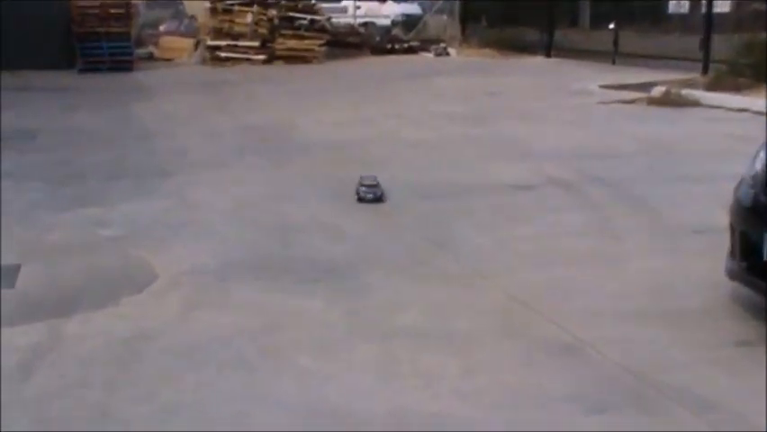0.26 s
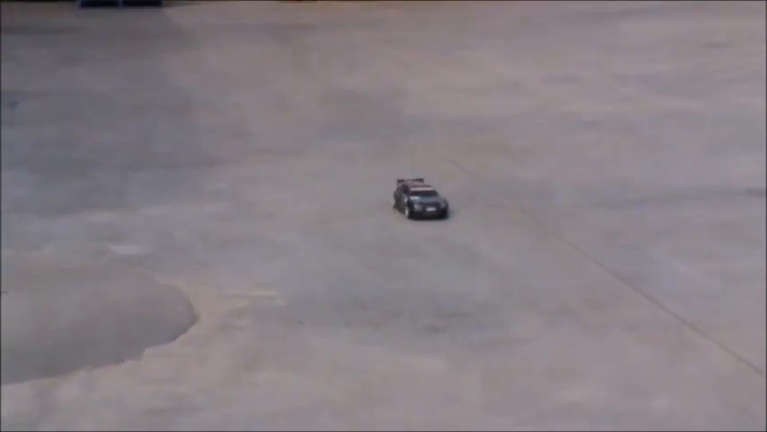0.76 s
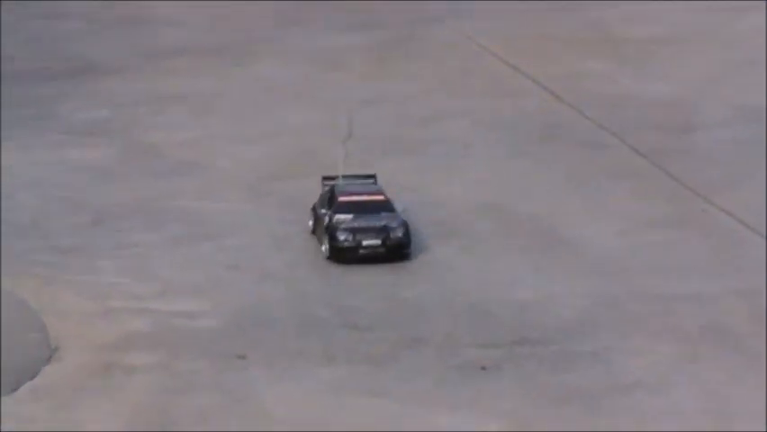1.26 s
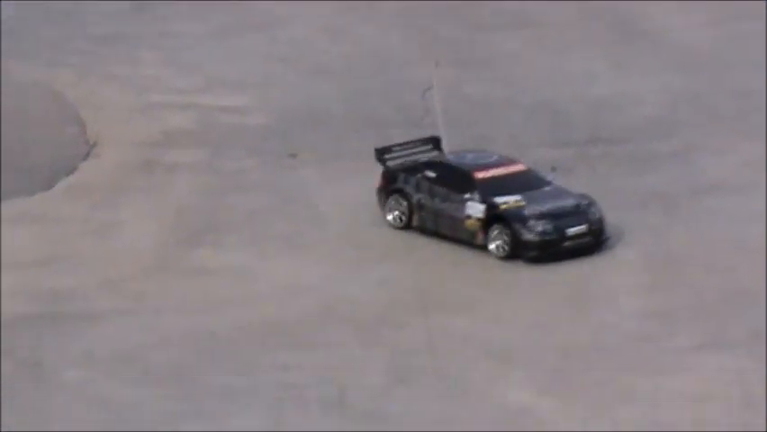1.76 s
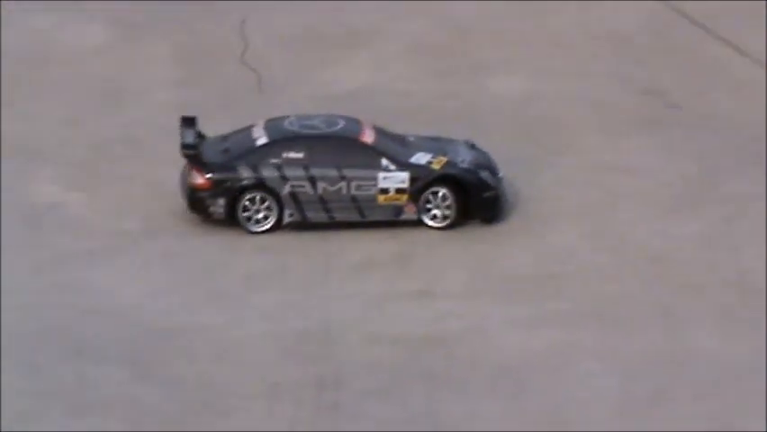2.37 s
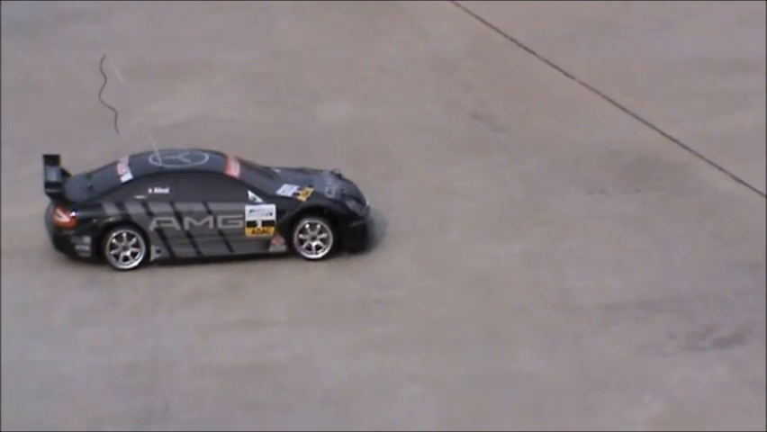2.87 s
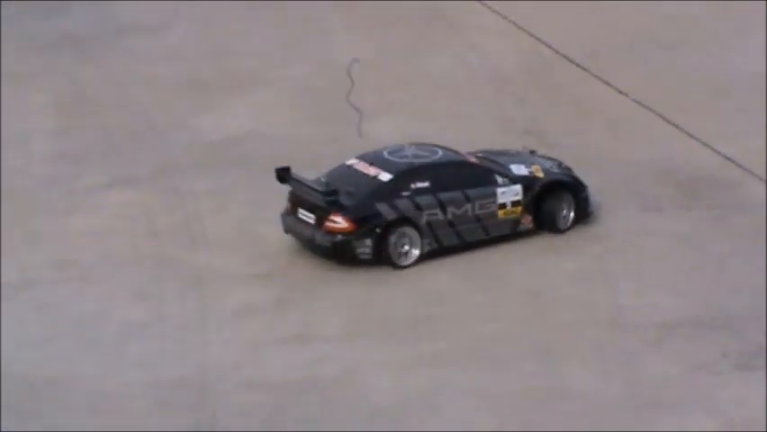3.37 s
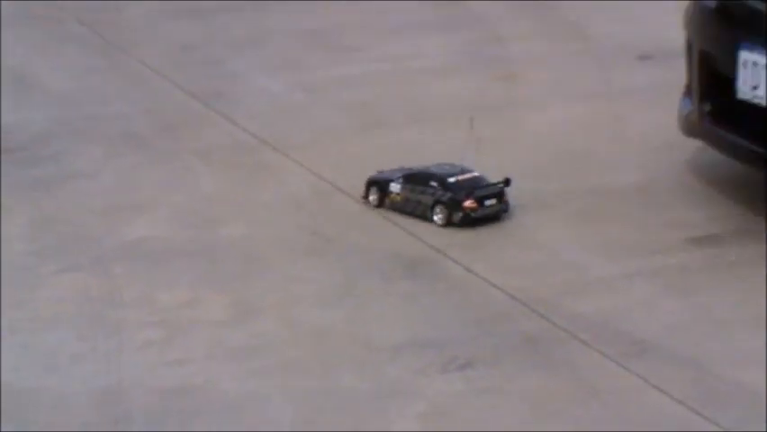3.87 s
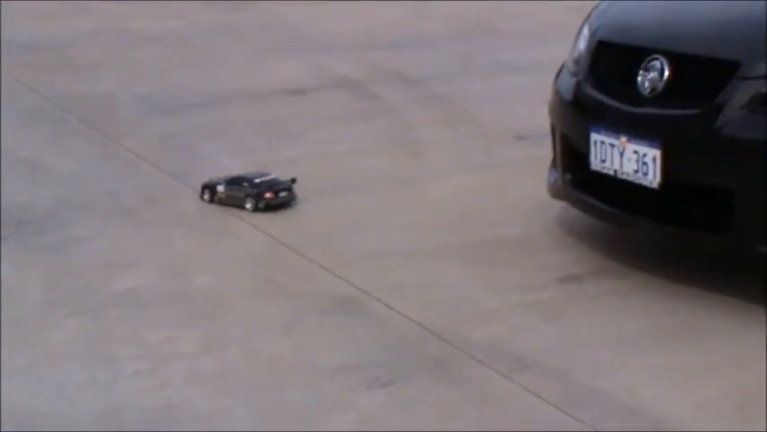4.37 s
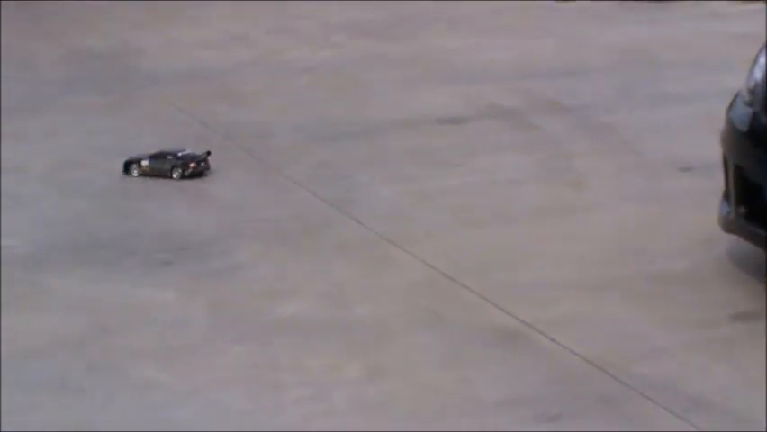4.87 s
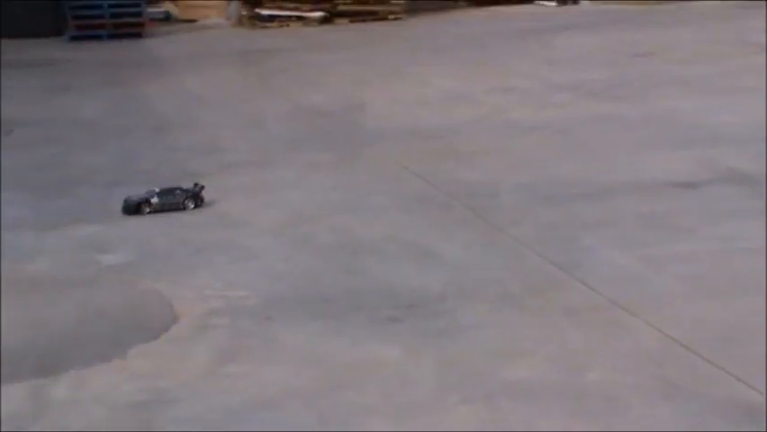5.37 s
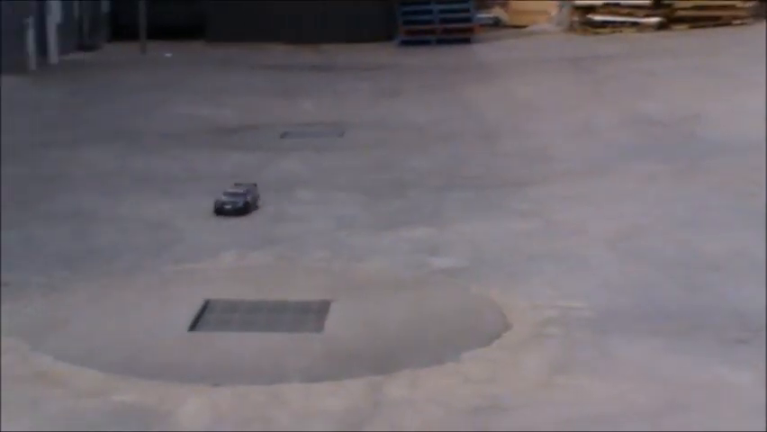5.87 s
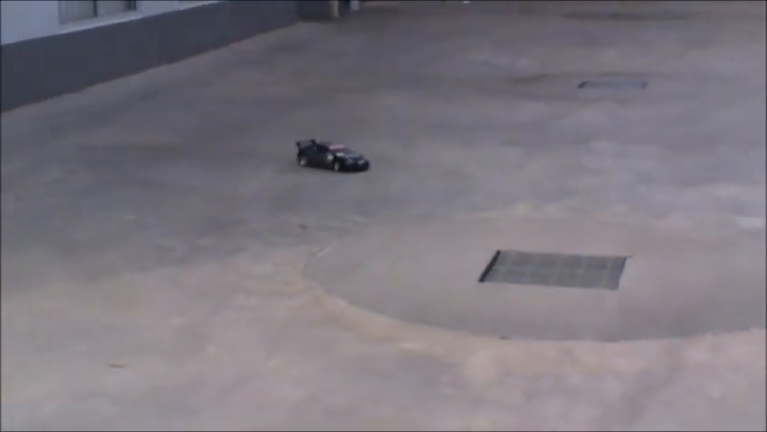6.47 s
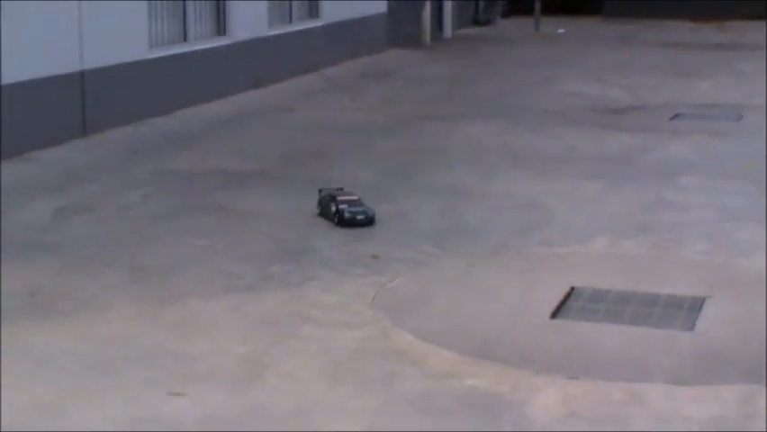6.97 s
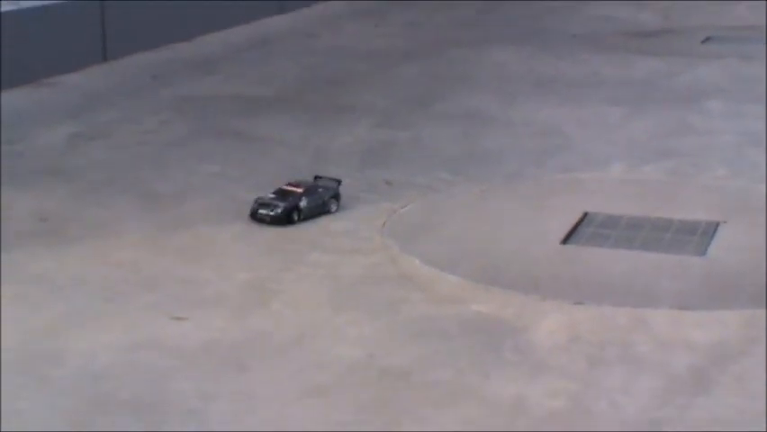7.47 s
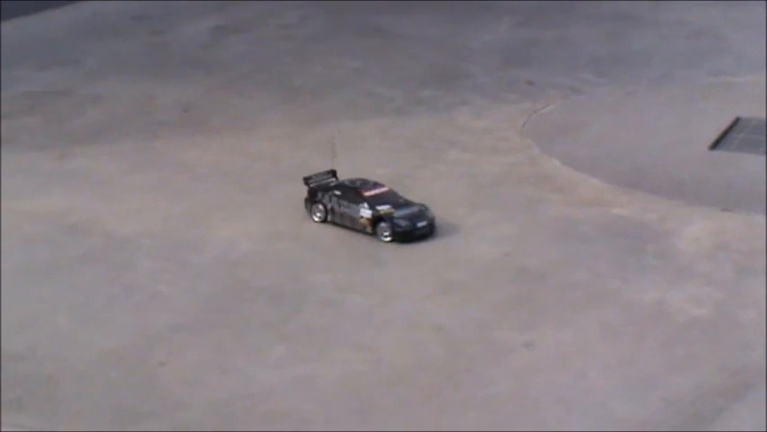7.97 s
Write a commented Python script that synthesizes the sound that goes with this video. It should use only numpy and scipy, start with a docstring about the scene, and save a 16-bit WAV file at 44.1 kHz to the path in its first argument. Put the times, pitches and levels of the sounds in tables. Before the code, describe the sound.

Close, bright stereo sound in an open concrete yard: a toy-sized electric car whines steadily, swells with rattling and hissing as it passes, then coasts down. A thin steering buzz fills the brief lull while wind thuds at the microphone. Sudden acceleration follows, with repeated quick rises and slower falling whines, chattering gears, dry stone ticks and a faint wall reflection.

```python
"""A thump of wind, then the whine of a small electric model car running on concrete, driven in bursts of throttle.
The whine is a sine at the gears' tooth rate, coloured by the resonances of the plastic shell.
Noise of tiny impacts makes shell rattle and tyre hiss; stones and grit add short cracks and ticks.
The rolling nearly dies away while the steering servo buzzes, a noise-driven set of resonances.
Low noise in lumps buffets the microphone ports over a sinking drone, likely a far engine, and steady air."""
import sys
import numpy as np
from scipy.fft import rfft, irfft, next_fast_len
from scipy.io import wavfile
from scipy.ndimage import uniform_filter1d, map_coordinates

SR = 44100
rng = np.random.default_rng(int(sys.argv[2]) if len(sys.argv) > 2 else 0)


def store_pcm(level_fs):
    """Save levels as 16-bit WAV."""
    pcm = np.round(np.clip(level_fs, -1, 1) * 32767).astype(np.int16)
    wavfile.write(sys.argv[1], SR, np.atleast_2d(pcm).T)


N = 362502

# plastic shell resonances: centre_hz, width_hz, gain_db
SHELL_MODES = [(1418, 92, 8.5), (2167, 130, 0), (2834, 170, 2), (3180, 200, -1), (3366, 58, 4),
               (4800, 71, -2)]
# bursts of throttle, a low pull being a dab of brake: squeeze_s, release_s, pull_toward_hz, slow_toward_hz
# (tooth rates), whine_at_squeeze_db, whine_at_release_db, coasting_fade_db_per_khz_lost
THROTTLE_BURSTS = [(0, 0.471, 5410, 4900, -33, -35.5, 13), (1.026, 1.549, 5304, 3999, -40, -27.5, 17),
                   (1.7, 1.81, 2150, 791.5, -34, -41, 25), (3.309, 3.587, 5040, 1239.5, -28, -27, 3.5),
                   (3.943, 4.094, 4870, 1189.5, -28.5, -30, 7), (4.332, 4.8, 4930, 1301, -33.5, -31.5, 14),
                   (4.807, 4.861, 1000, 2200, -35, -42, 5), (5.138, 5.35, 5256, 1100, -34.5, -32.5, 2.5),
                   (5.514, 5.72, 5730, -420, -32, -30, 3), (5.89, 6.018, 5990, 261.5, -28.5, -29.5, 4.5),
                   (6.187, 6.444, 5680, 2690, -30, -35, 0), (6.578, 7.424, 5254, 2399.5, -32.5, -28.5, -2),
                   (7.544, 7.61, 6500, 1600.5, -31, -32, -1), (7.683, 7.726, 1500, 1450, -36, -37, 4),
                   (7.939, 8.164, 5520, 1210, -29, -32.5, -1)]


def amp(db):
    """Decibels to gain."""
    return 10 ** (np.asarray(db) / 20)


def unit(x):
    """Scaled to rms 1."""
    return x / np.sqrt(np.mean(x ** 2) + 1e-20)


def along(points, hz):
    """(Hz, value) points interpolated on a log frequency axis."""
    point_hz, value = np.transpose(points)
    return np.interp(np.log(hz + 1), np.log(point_hz + 1), value)


def curves(rows):
    """One value per sample for each column after the time."""
    time_s, *columns = np.transpose(rows)
    return [np.interp(np.arange(N) / SR, time_s, column) for column in columns]


def sounding(start_s, end_s, fade_s):
    """Gate: 1 from start to end, 0 outside, linear fades."""
    knots_s = [start_s - fade_s, start_s, end_s, end_s + fade_s]
    return np.interp(np.arange(N) / SR, knots_s, [0, 1, 1, 0])


def wobble(rate_hz):
    """Smooth random curve with rate_hz knots a second."""
    knots = rng.standard_normal(int(N * rate_hz / SR) + 4)
    return map_coordinates(knots, [np.arange(N) * rate_hz / SR])


def filtered(x, response):
    """x times a complex response of frequency."""
    size = next_fast_len(N + SR // 2)
    return irfft(rfft(x, size) * response(np.fft.rfftfreq(size, 1 / SR)), size)[..., :N]


def modes(table):
    """Causal response of a set of resonances."""
    def response(f):
        return sum(amp(db) * 1j * f * width / (centre ** 2 - f * f + 1j * f * width)
                   for centre, width, db in table)
    return response


def spread(pair, spectrum, alike):
    """Two unrelated signals, coloured and mixed to left and right of a given likeness, rms 1."""
    def mid_side(hz):
        turn = np.arccos(np.clip(along(alike, hz), -1, 1)) / 2
        return amp(along(spectrum, hz)) * [np.cos(turn), np.sin(turn)]
    mid, side = filtered(pair, mid_side)
    return unit(np.array([mid + side, mid - side]))


def gritty(spiky_db):
    """Noise of tiny impacts whose strength changes about every millisecond."""
    return amp(spiky_db * wobble(900)) * rng.standard_normal((2, N))


def gears(hz):
    """Tooth tone swells where it crosses a shell resonance and chatters as the car overruns the motor."""
    # stretches where the whine smears: start_s, end_s, phase_scatter_rad
    jolts = [(.6, .98, .6), (3.42, 3.6, .9), (5.99, 6.09, 1.1)]
    # slower shafts heard at times: teeth_per_beat, start_s, end_s, level_db (relative to the tooth tone)
    undertones = [(2, .04, .52, -6), (2, 5.16, 5.18, -4), (6, .08, .45, -12), (8, .65, 1.2, -4),
                  (1.5, 3.44, 3.56, -10)]
    clean_hz = 3000  # below this rate the whine grows purer
    t = np.arange(N) / SR
    rough = np.where(t < 2, .6, 1)  # smooth cruising first, then bursts of throttle shake the gears
    rough = rough * np.clip(hz / clean_hz, .6, 1)
    smear = sum(scatter * sounding(start, end, .02) for start, end, scatter in jolts) * wobble(700)

    # chatter restarts at each release
    released_s = np.array([0] + [row[1] for row in THROTTLE_BURSTS])
    coasting_s = t - released_s[np.searchsorted(released_s, t, side="right") - 1]
    change = np.gradient(hz) * SR / 8000
    # slowing opens the play between the teeth; a hard pull shakes it too
    overrun = np.clip(np.maximum(-change, change / 10), .1, 1)
    chatter = overrun * np.cos(2 * np.pi * 30 * (coasting_s - .02) + .7 * wobble(6.6))

    jitter = rough * (1.1 * wobble(300) + 2.2 * wobble(60))
    phase = 2 * np.pi * np.cumsum(hz) / SR + jitter + 6 * chatter + smear
    flutter_db = 6 * chatter + rough * (2 * wobble(60) + 3 * wobble(200))
    tone = np.sin(phase) * amp(flutter_db)
    for teeth, start, end, under_db in undertones:
        level = amp(under_db + 3.5 * wobble(90) + 3 * wobble(35))
        shaft = np.sin(phase / teeth + 1.8 / teeth * wobble(200))
        tone = tone + sounding(start, end, .04) * level * shaft
    tone = tone * amp(tooth_load(hz))
    whine = tone + filtered(tone, modes(SHELL_MODES))
    wall = amp(-10) * np.pad(whine, (SR // 30, 0))[:N]  # a wall returns the glides late
    whine = whine + wall + singing(hz)
    echo = np.roll(whine, 310) * amp(-14.5)  # a nearby surface, opposite in sign on the two sides
    return np.array([whine + echo, whine - echo])


def tooth_rate():
    """Motor closes in exponentially on the rate the throttle calls for; returns Hz."""
    start_hz, spin_up_s, slow_s = 5200, .103, .183  # the last two are time constants
    trigger_s = .064  # travel of the trigger
    t, hz, now_hz = np.arange(N) / SR, np.zeros(N), start_hz
    steps = []
    for on, off, top_hz, low_hz, *_ in THROTTLE_BURSTS:
        steps += [(on, top_hz, spin_up_s), (off, low_hz, slow_s)]
    for (s, goal_hz, lag_s), (end, *_) in zip(steps, steps[1:] + [(N / SR,)]):
        span = slice(round(s * SR), round(end * SR))
        hz[span] = goal_hz + (now_hz - goal_hz) * np.exp(-(t[span] - s) / lag_s)
        now_hz = goal_hz + (now_hz - goal_hz) * np.exp(-(end - s) / lag_s)
    travel = round(trigger_s * SR)
    once = uniform_filter1d(hz, size=travel, mode="nearest")
    return uniform_filter1d(once, size=travel, mode="nearest")


def tooth_load(hz):
    """Whine dB: set under throttle, following speed while coasting, cut once the teeth part."""
    slack_s, slack_hz, slack_db = .25, 2500, 18  # coasting this long, below this rate, loses this much
    t, db = np.arange(N) / SR, np.zeros(N)
    for on, off, _, _, on_db, off_db, fade_db in THROTTLE_BURSTS:
        lost_khz = np.where(t > off, hz[round(off * SR)] - hz, 0) / 1000
        slack = (t > off + slack_s) & (hz < slack_hz)
        burst_db = np.interp(t, [on, off], [on_db, off_db]) - fade_db * lost_khz - slack_db * slack
        db = np.where(t >= on, burst_db, db)
    return uniform_filter1d(db, size=SR // 50)


def singing(hz):
    """The mesh catches the shell's sharpest mode: short tones bent by the passing tooth rate."""
    # start_s, level_db
    sings = [(3.39, -11.5), (3.691, -14), (4.0215, -20), (4.155, -21), (4.3907, -16), (5.5288, -17),
             (5.9221, -24), (6.2106, -21), (6.2339, -23), (7.99, -20.5)]
    mode_hz, held_s, glide = 3357, 0.0187, .3  # glide: share of the tooth rate's offset followed
    held = sum(amp(db) * sounding(s + 0.00072, s + held_s, 0.001) for s, db in sings)
    pitch_hz = mode_hz + glide * (hz - mode_hz)
    phase = 2 * np.pi * np.cumsum(pitch_hz) / SR + .5 * wobble(150)
    return held * amp(0.52 * wobble(150)) * np.sin(phase)


def rolling(hz):
    """Shell and tyres shake together over the bumps and grit of the concrete."""
    # levels at full speed: time_s, rattle_db, hiss_db, hiss_treble_gain_db
    roll = [(0, -34, -39.5, 7.5), (1, -29.5, -32.5, 3.5), (1.68, -26, -30.5, -0.5), (2, -28, -26, 0.5),
            (2.35, -33.5, -25, -5), (2.44, -40, -36, -6), (2.7, -47, -46.5, 1), (3.26, -40, -44, -5),
            (3.32, -23, -30.5, 2), (3.41, -23.5, -23, 2), (3.75, -27.5, -26.5, -1.5), (4.1, -24, -24, 0.5),
            (4.33, -27.5, -29.5, -3), (4.6, -29.5, -30.5, 0), (5.5, -26.5, -30, 1),
            (6.4, -29.5, -31.5, 3.5), (7.45, -25, -30, 1), (7.8, -21.5, -22, -3), (8.22, -27, -28.5, 0.5)]
    # spectra, relative: freq_hz, level_db
    rattle_spectrum = [(350, -1), (600, 0), (1000, -1.5), (1750, -4.5), (2500, -0.5), (3500, -0.5),
                       (4500, -2), (7000, -32)]
    tyre_spectrum = [(2500, -48), (4000, 0), (5000, 3), (6500, 0), (7400, -5), (11000, -6), (14000, -9.5),
                     (15900, -18)]
    # left-right likeness of the car: freq_hz, likeness
    car_alike = [(600, 1), (1400, 0.78), (3000, 0.93), (7000, 0.75), (15000, 0.74)]
    full_hz, crawl_hz = 5000, 2000  # tooth rates: full speed, and the one below which loudness stays put
    rattle_power, hiss_power = 0.63, 0.62  # amplitude grows as speed to this power
    rattle_db, hiss_db, treble_db = curves(roll)
    speed = np.clip(hz, crawl_hz, None) / full_hz
    bumps_db = .5 * wobble(10) + 1.1 * wobble(40)
    shaken = gritty(1.34)
    rattle = spread(shaken + 0.41 * filtered(shaken, modes(SHELL_MODES)), rattle_spectrum, car_alike)
    hiss = spread(gritty(1.93), tyre_spectrum, car_alike)
    treble = filtered(hiss, lambda f: 1 / (1 + (7500 / (f + 1)) ** 6))
    hiss = hiss + (amp(treble_db) - 1) * treble
    rattle = amp(rattle_db) * speed ** rattle_power * rattle
    hiss = amp(hiss_db + 0.3 * wobble(60)) * speed ** hiss_power * hiss
    return amp(bumps_db) * (rattle + hiss)


def knocks():
    """Stones hit the car: decaying tones whose random phase drift broadens them around their pitch."""
    # start_s, peak_db, pitch_hz
    stones = [(1.402, -12.5, 1350), (2.334, -15, 4780), (8.174, -17, 5900)]
    out, t = np.zeros(N), np.arange(SR // 50) / SR
    for s, db, hz in stones:
        drift = np.cumsum(0.19 * rng.standard_normal(len(t)))
        ring = np.sin(2 * np.pi * hz * t + drift)
        out[round(s * SR):][:len(t)] += amp(db - 60 * t / 0.024) * ring
    return out


def ticks():
    """Grit flicked against the shell: each grain is a bright, dry burst of decaying noise."""
    # start_s, level_db (3 dB over the noise rms at onset, ahead of the high-pass)
    grains = [(0.1496, -18), (0.2713, -15), (2.0567, -17), (3.568, -12), (3.7928, -14), (4.0946, -12),
              (5.9574, -14), (7.3642, -13), (7.426, -9.5)]
    t60_s, low_hz = 0.028, 6500
    out, t = np.zeros(N + SR), np.arange(SR // 50) / SR
    for s, db in grains:
        out[round(s * SR):][:len(t)] += amp(db - 3 - 60 * t / t60_s) * rng.standard_normal(len(t))
    return filtered(out[:N], lambda f: (1j * f / (low_hz + 1j * f)) ** 2)


def servo():
    """Tiny steering gears grind in a ringing case; low tones drop between strokes, strain bends pitch."""
    # time_s, buzz_db, low_tones_gain_db, pitch_share
    strokes = [(2.88, -48, -6, 1), (2.93, -40, -1, 1.01), (2.975, -38, 0, 1), (2.99, -44, -9, 1.03),
               (3.07, -43, -8, 1.01), (3.09, -43.5, 2, 1), (3.23, -38, -5, 1), (3.26, -40, -2, 0.94),
               (3.28, -63, -1, 1.1)]
    # case resonances: centre_hz, width_hz, gain_db
    case_modes = [(3830, 35, 7), (4000, 35, 6), (4970, 87, 0), (5340, 190, 2), (5500, 37, 6),
                  (5930, 50, -3), (6500, 60, -6), (8350, 120, -5)]
    db, low_db, share = curves(strokes)
    grind = rng.standard_normal(N)
    buzz = np.zeros(N)
    for mode in case_modes:
        # a tooth tone sits in each resonance
        teeth = .095 * np.sin(2 * np.pi * mode[0] * np.arange(N) / SR + 1.5 * wobble(80))
        tone = filtered(grind + teeth, modes([mode]))
        buzz = buzz + tone * (amp(low_db) if mode[0] < 4500 else 1)
    start_s, end_s = strokes[0][0], strokes[-1][0]
    start = round(start_s * SR)
    bent = np.cumsum(share) - np.cumsum(share)[start] + start  # read position, in samples
    buzz = unit(map_coordinates(buzz, [bent + 4 * wobble(9)], order=3))
    return sounding(start_s, end_s, 0.022) * amp(db + wobble(29.8)) * buzz


def wind():
    """Eddies thump the microphone ports in lumps; strong gusts reach higher in pitch."""
    # time_s, buffet_db
    gusts = [(0, -10.5), (.09, -28), (.53, -31), (1.58, -25.5), (2.36, -15), (2.52, -23), (2.56, -13),
             (2.88, -16.5), (3.05, -10.5), (3.29, -13), (3.41, -16.5), (3.89, -15), (4.19, -27), (4.3, -15),
             (4.42, -27), (4.53, -17), (4.83, -16), (4.88, -24.5), (5.5, -14), (6.1, -18), (6.75, -21),
             (7.2, -23), (7.55, -17), (8.01, -15.5), (8.22, -22.5)]
    # relative spectrum: freq_hz, level_db
    buffet_spectrum = [(12, -40), (20, -14), (58, 0.5), (128, -2.5), (325, -14), (1700, -44.5), (3250, -77)]
    # left-right likeness before the lean and lag: freq_hz, likeness
    port_alike = [(30, 0.66), (70, 0.61), (150, 0.51), (640, 0.95), (3000, 0.18)]
    # eddies pass one port first: freq_hz, left_lead_rad
    sweep = [(30, 0.5), (260, -2), (520, -2.5), (1120, -2), (2800, -1.5)]
    # sharp-edged eddies: start_s, upper_wind_boost_db
    slaps = [(2.553, 5.1), (3.021, 9.6), (3.079, 7.6), (3.244, 6)]
    slap_s, calm_db = 0.013, -18.5  # gusts over calm_db brighten, weaker ones dull
    db, = curves(gusts)
    lumps = amp(1.28 * wobble(14) + 2.28 * wobble(45))
    sides = np.array([[1], [-1]])

    def passing(hz):
        lean = amp(1.45 * sides / (1 + hz / 300))  # the left port faces the wind
        return lean * np.exp(.5j * sides * along(sweep, hz))

    pair = spread(rng.standard_normal((2, N)), buffet_spectrum, port_alike)
    eddies = unit(lumps * filtered(pair, passing))
    slap_db = sum(boost_db * sounding(s, s + slap_s, .007) for s, boost_db in slaps)
    sharp_db = 1.1 * wobble(30) + slap_db
    upper = filtered(eddies, lambda hz: hz ** 2 / (hz ** 2 + 250 ** 2))
    return amp(db) * (eddies - upper + amp(0.47 * (db - calm_db) + sharp_db) * upper)


def yard():
    """A low drone, likely a far engine, sinks in pitch over the steady air of the yard."""
    # distant traffic and air, relative spectrum: freq_hz, level_db
    air_spectrum = [(100, -23), (250, -8.5), (700, -8.5), (3300, -20), (4700, -29), (10000, -29.5),
                    (15700, -50)]
    # start_s, end_s, level_db
    drone_heard = [(0, 0.306, -28.5), (0.673, 1.582, -28), (1.693, 2.4, -30)]
    drone_hz, sag_hz_per_s = 118.3, 8.5
    hz = drone_hz - sag_hz_per_s * np.arange(N) / SR
    heard = sum(amp(db) * sounding(start, end, 0.057) for start, end, db in drone_heard)
    phase = 2 * np.pi * np.cumsum(hz) / SR + .3 * wobble(12)
    drone = np.sqrt(2) * np.sin(phase) * amp(1.5 * wobble(8))
    air = spread(rng.standard_normal((2, N)), air_spectrum, [(1000, 0.7), (8000, 0.37)])
    return heard * drone + amp(-38) * air


def scene():
    """Everything at the microphone."""
    hz = tooth_rate()
    return gears(hz) + rolling(hz) + knocks() + ticks() + servo() + wind() + yard()


def record(dry):
    """The loudest thumps flatten softly; nothing is kept above the band limit."""
    top_hz = 15830
    soft = dry / (1 + np.abs(dry / .97) ** 6) ** (1 / 6)
    return filtered(soft, lambda hz: hz < top_hz)


dry = scene()
out = record(dry)
store_pcm(out)
```